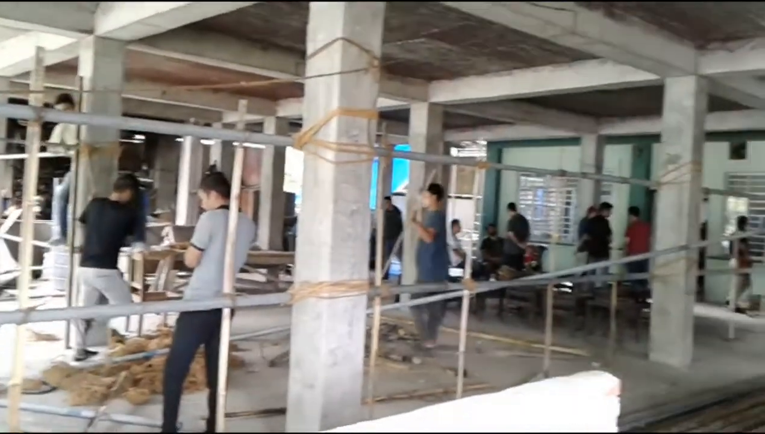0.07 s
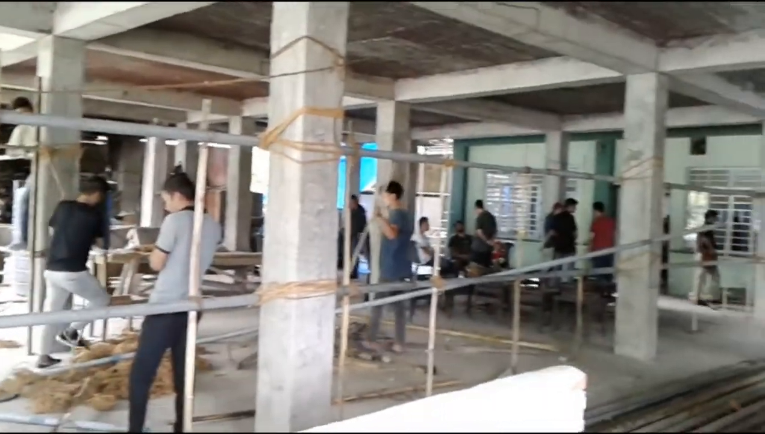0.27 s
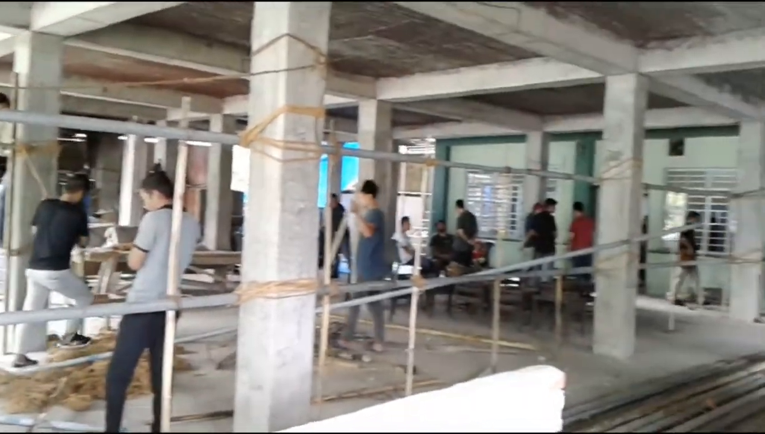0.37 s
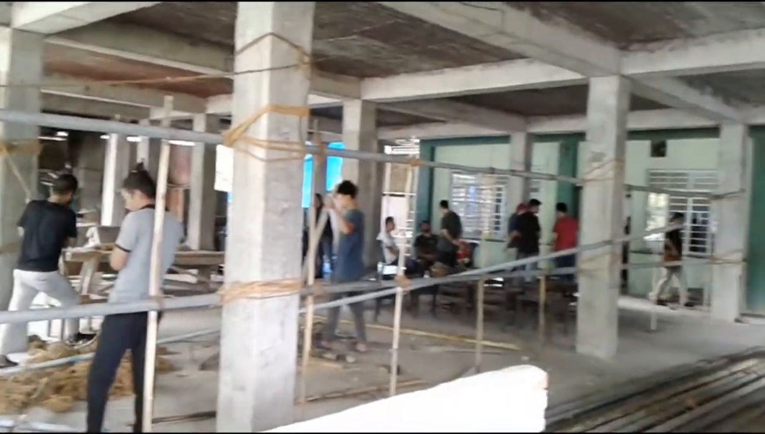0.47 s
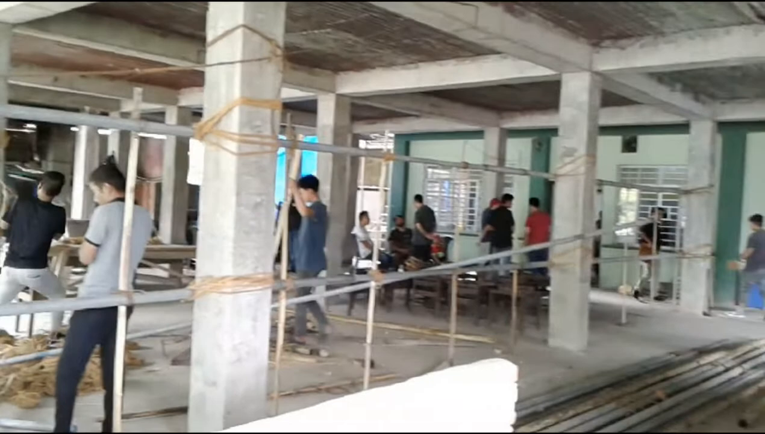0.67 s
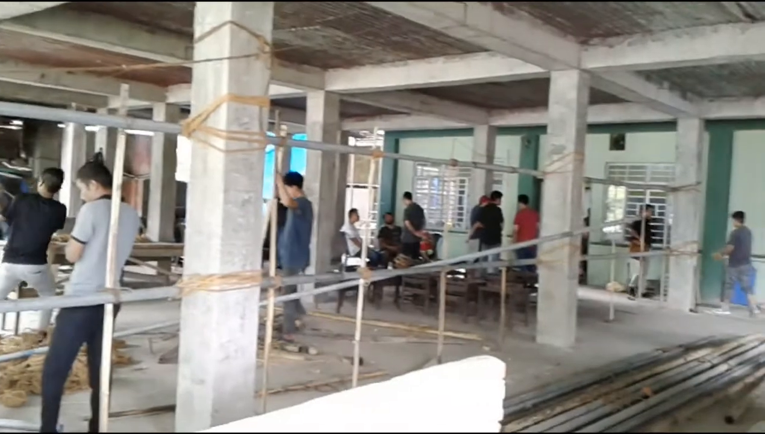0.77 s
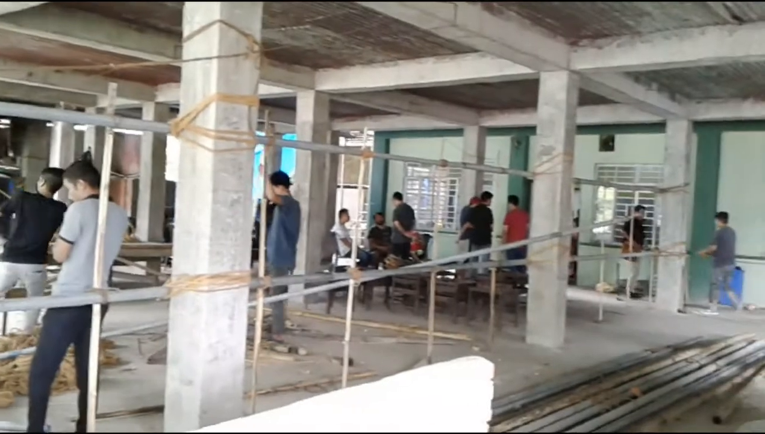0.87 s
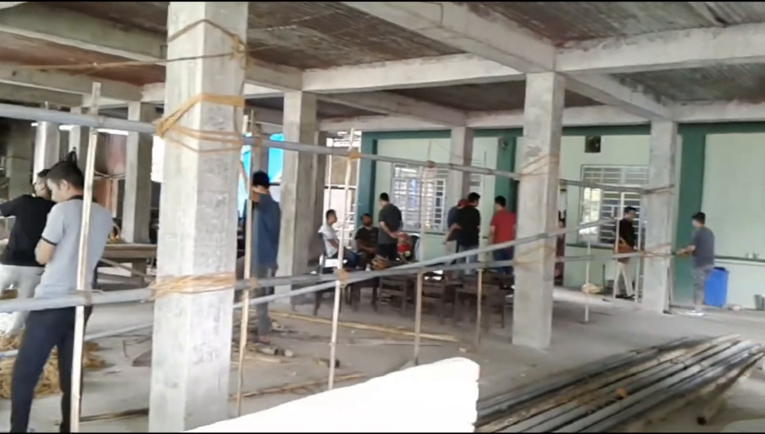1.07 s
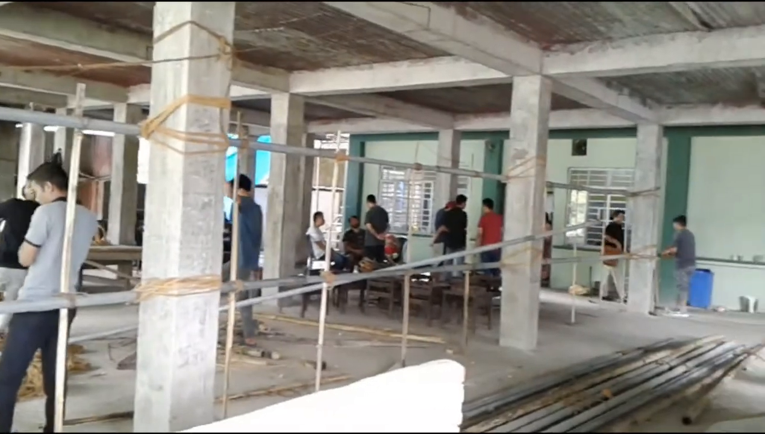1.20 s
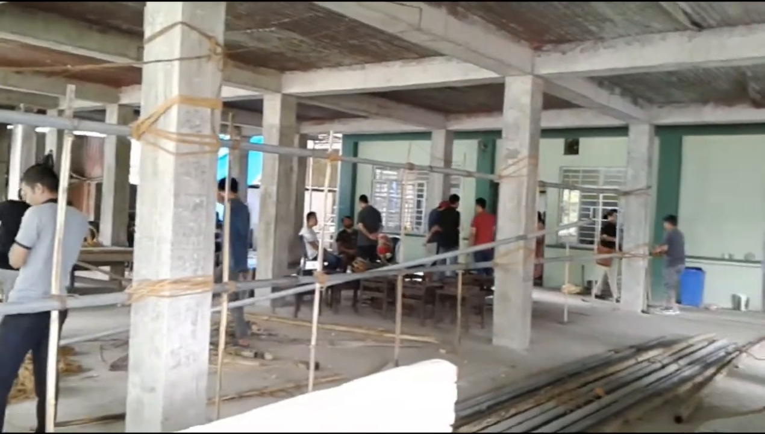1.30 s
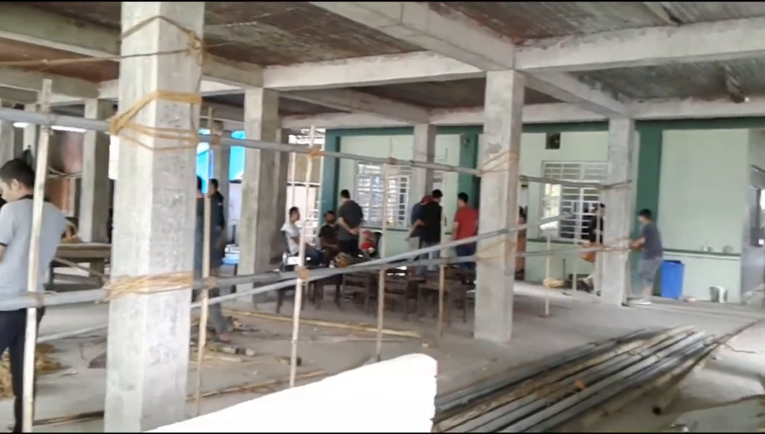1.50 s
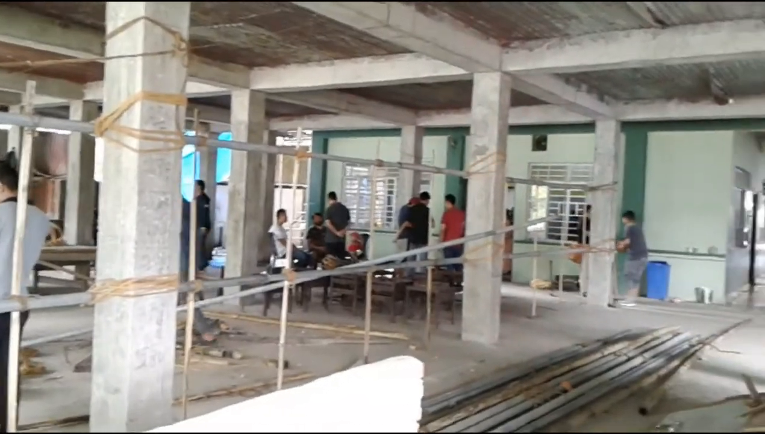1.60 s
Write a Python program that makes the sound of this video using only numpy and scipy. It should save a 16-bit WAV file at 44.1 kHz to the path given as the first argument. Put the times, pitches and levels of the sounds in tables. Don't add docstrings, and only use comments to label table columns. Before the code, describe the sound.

Two loud clanking drops of metal pipes at a building site, the first trailing into a groaning slide, the second a short double bang, then a faint distant tap, low wind bumps and a bare concrete echo.

```python
import sys
import numpy as np
from scipy import signal
from scipy.fft import rfft, irfft
from scipy.io import wavfile
from scipy.ndimage import uniform_filter1d

SR = 44100
rng = np.random.default_rng(int(sys.argv[2]) if len(sys.argv) > 2 else 0)


def pcm_store(signal):
    levels = np.round(np.clip(np.atleast_2d(signal), -1, 1) * 32767)
    wavfile.write(sys.argv[1], SR, levels.astype(np.int16).T)


def decibels_to_gain(level_db):
    exponent = np.asarray(level_db, float) / 20
    return 10 ** exponent


N = 72765

# (frequency [Hz], level [dB])
STEEL = [(410, -26.5), (700, -4), (813, -13.5), (1050, -5), (1890, -5), (2840, -18.5), (3830, -26.5),
         (8090, -56.5), (9000, -61.5), (11700, -71), (15000, -81), (19800, -78.5)]
# (time [s], level [dB], brightness [dB], weight [dB])
RATTLE = [
    (0.226, -62, -3.5, 22),
    (0.231, -35, -9.5, 12),
    (0.25, -36, -8, 10.5),
    (0.282, -33, -8.5, 13.5),
    (0.29, -29.5, -7.5, 9),
    (0.379, -24.5, -8, -1),
    (0.557, -35.5, -11.5, -6),
    (0.717, -56.5, -18, -1),
    (0.78, -64.5, 5, 5),
]


def evened(x):
    return x / np.sqrt(np.mean(x ** 2) + 1e-20)


def read(points, hz):
    f, value = np.transpose(points)
    return np.interp(np.log(hz + 1), np.log(f + 1), value)


def curve(rows, column=1, outside=-120):
    rows = np.array(rows)
    return np.interp(np.arange(N) / SR, rows[:, 0], rows[:, column], outside, outside)


def add(mix, s, sound):
    part = mix[round(s * SR):][:len(sound)]
    part += sound[:len(part)]


def colour(x, points, lo_hz=0, hi_hz=30000):
    hz = np.fft.rfftfreq(len(x), 1 / SR) + 1
    edges = 1 / np.sqrt((1 + (lo_hz / hz) ** 8) * (1 + (hz / hi_hz) ** 8))
    return evened(irfft(rfft(x) * decibels_to_gain(read(points, hz)) * edges, len(x)))


def resonate(x, hz, width):
    turn = np.exp(2j * np.pi * np.cumsum(hz * np.ones(len(x))) / SR)
    r = np.exp(-np.pi * abs(width) / SR)
    return 2 * (turn * signal.lfilter([1 - r], [1, -r], x / turn)).real


def noise_band(noise, hz, width):
    return evened(resonate(resonate(noise, hz, width), hz, width))


def site_floor():
    # (frequency [Hz], level [dB])
    hush = [(410, -38.5), (700, 1), (851, -13.5), (2510, -18), (4500, -27), (5920, -28.5), (7770, -31),
            (11300, -28.5), (15700, -31)]
    # (frequency [Hz], tone level [dB], skirt level [dB])
    whines = [(5749, -84.5, -97), (11499, -91, -92), (11612, -92, -100), (14500, -104, -104),
              (5281, -92, -105)]
    t = np.arange(N) / SR
    out = decibels_to_gain(-74) * colour(rng.standard_normal(N), hush, lo_hz=745)
    for hz, db, skirt_db in whines:
        out += decibels_to_gain(db) * np.sin(2 * np.pi * hz * t)
        out += decibels_to_gain(skirt_db) * noise_band(rng.standard_normal(N), hz, width=300)
    return out


def wind():
    # (time [s], gust level [dB], roar over gust [dB])
    gusts = [(0.0, -51, -10.5), (0.178, -55, -17), (0.26, -52, 27.5), (0.38, -47, 20.5),
             (0.564, -47.5, 17.5), (0.766, -52, 10.5), (0.79, -43, 13.5), (0.868, -46, 16.5),
             (0.942, -47.5, -0.5), (1.006, -40.5, -3.5), (1.024, -43, -12.5), (1.262, -51.5, -1.5),
             (1.406, -42.5, -11.5), (1.432, -54, -10.5), (1.584, -51, -5), (1.65, -55, -16)]
    # (frequency [Hz], level [dB])
    wind_colour = [(12, -20), (20, -9), (80, -4), (113, -11.5), (301, -16), (341, -22), (464, -16),
                   (526, -18.5), (1500, -36.5), (1950, -68), (3300, -120)]
    lump_db, split_hz = 3, 200
    lumps = evened(uniform_filter1d(uniform_filter1d(rng.standard_normal(N), 700), 700))
    noise = rng.standard_normal(N)
    low = colour(noise, wind_colour, hi_hz=split_hz)
    roar = colour(noise, wind_colour, lo_hz=split_hz)
    gust_gain = decibels_to_gain(curve(gusts, outside=-60) + lump_db * lumps - 4.0)
    roar_gain = decibels_to_gain(curve(gusts, column=2, outside=0) - 2.0)
    return gust_gain * (low + roar_gain * roar)


def fizz(x):
    size = np.sqrt(abs(uniform_filter1d(x ** 2, size=130)))
    grit = colour(rng.standard_normal(N), [(9000, -2), (11500, -1), (16000, -12.5)], lo_hz=8500)
    return decibels_to_gain(-59) * size * grit


def hall(x):
    # (frequency [Hz], time to fall 60 dB [s])
    decay = [(200, 0.54), (1000, 1.4), (2000, 1), (4000, 1.23), (6000, 2.6), (10000, 0.87)]
    tilt_db = 7.5
    taps = np.zeros(SR)
    at = np.arange(400, SR - 20, 20)
    taps[at + rng.integers(0, 20, len(at))] = rng.choice([-1., 1.], len(at))
    hz, t, z = signal.stft(taps, SR, nperseg=256)
    tilt = tilt_db * np.log2(np.clip(hz, 300, 5000) / 2000)
    fall = -60 * t / read(decay, hz)[:, None]
    tail = signal.istft(z * decibels_to_gain(tilt[:, None] + fall), SR, nperseg=256)[1]
    return signal.fftconvolve(x, tail / np.linalg.norm(tail))[:N]


def far_tap():
    # (frequency [Hz], width [Hz], level [dB])
    resonances = [(1754, 450, 6), (2310, 390, 3.5), (3620, 550, -12.5), (6840, 900, -21)]
    start_s, level_db, tail_t60_s, tap_t60_s = 1.259, -59.5, 1, 0.16
    t = np.arange(SR // 2) / SR
    noise = rng.standard_normal(len(t))
    body = sum(decibels_to_gain(db) * noise_band(noise, hz, width) for hz, width, db in resonances)
    tail = decibels_to_gain(level_db - 60 * t / tail_t60_s)
    tap = decibels_to_gain(level_db - 6.0 - 60 * t / tap_t60_s)
    return start_s, evened(body) * (tail + tap) * np.minimum(t / 0.0016, 1)


def singing():
    # (frequency [Hz], level [dB])
    kept_modes = [(1023, -36.5), (1082, -34.5), (1507, -34), (1739, -40.5), (1836, -43), (1922, -38.5),
                  (2229, -38), (2272, -36.5), (2670, -43), (3020, -61), (3548, -77), (3693, -48)]
    modes = sum(decibels_to_gain(db) * evened(resonate(rng.standard_normal(N), hz, width=10)) for hz, db in kept_modes)
    return decibels_to_gain(curve(RATTLE) - 4) * evened(modes)


def groan(start, length, hz, db):
    roughness = 0.25
    t = np.arange(0, length, 1 / SR)
    turn = 2 * np.pi * hz * t
    rough = noise_band(rng.standard_normal(SR // 4)[:len(t)], hz, width=60)
    clean = np.sin(turn) + decibels_to_gain(-18) * np.sin(turn / 2) + decibels_to_gain(-18) * np.sin(2 * turn)
    tone = np.sqrt(2) * (1 - roughness) * clean + roughness * rough
    swell = abs(np.sin(np.pi * (t / length) ** .9)) ** .6
    return start, decibels_to_gain(db) * swell * tone


def pipe_tick():
    t60_s = 0.08
    t = np.arange(4096) / SR
    hz = (np.geomspace(300, 12000, num=90) * rng.uniform(.97, 1.03, 90))[:, None]
    phase = 2 * np.pi * rng.random((90, 1))
    decay = decibels_to_gain(-60 * t * (hz / 2000) ** .5 / t60_s)
    return (np.sqrt(hz) * np.sin(2 * np.pi * hz * t + phase) * decay).sum(0)


def rattle():
    # (time [s], level [dB], brightness [dB], weight [dB])
    second_rattle = [
        (0.775, -61.5, 9, -9),
        (0.785, -27, -21, -1),
        (0.827, -31.5, -8.5, 4),
        (0.841, -21, -21.5, 2.5),
        (0.939, -50.5, -9, 15.5),
        (1.05, -68, -25, 23),
        (1.2, -96, -8.5, 26.5),
    ]
    # (frequency [Hz], level [dB])
    stack = [(29, -51), (50, -19.5), (178, 2), (372, -7), (413, -13.5), (600, -7.5), (780, -28.5),
             (1320, -120)]
    ticks_per_s, tick_spread_db, scrape_db, split_hz = 900, 2.2, 0.5, 3670
    size = decibels_to_gain(tick_spread_db * np.minimum(rng.exponential(1, N), 4))
    size = size * (rng.random(N) < ticks_per_s / SR)
    which, ticks = rng.integers(0, 12, N), np.zeros(N)
    for k in range(12):
        ticks += signal.oaconvolve(size * (which == k), pipe_tick())[:N]
    ticks /= np.sqrt(uniform_filter1d(ticks ** 2, 2000) + 1e-9)
    ticks = ticks + decibels_to_gain(scrape_db) * rng.standard_normal(N)
    low = colour(ticks, STEEL, hi_hz=split_hz)
    high = colour(ticks, STEEL, lo_hz=split_hz)
    shake = colour(rng.standard_normal(N), stack)
    out = np.zeros(N)
    for rows, trim_db in ((RATTLE, -1.5), (second_rattle, -5.0)):
        brightness = decibels_to_gain(curve(rows, column=2, outside=0))
        weight = decibels_to_gain(curve(rows, column=3, outside=0) - 4.5)
        out += decibels_to_gain(curve(rows) + trim_db) * (low + brightness * high + weight * shake)
    return out


def thud(start, db, hz, t60):
    t = np.arange(SR // 3) / SR
    turn = 2 * np.pi * hz * t
    push = np.sin(turn) + 0.18 * np.sin(2 * turn + 0.72)
    return start, decibels_to_gain(db - 60 * t / t60) * (1 - np.exp(-t / 0.0012)) * push


def knock(start, db, hz, t60):
    # (frequency [Hz], level [dB], time to fall 60 dB [s])
    pipe = [(1220, -20, 0.42), (1350, -44, 5.0), (1580, -31.5, 0.46), (1660, -31, 0.16),
            (1880, -26.5, 0.41), (2000, 3.5, 0.0482), (2020, -33.5, 5.0), (2500, -23.5, 0.14),
            (3940, -22.5, 0.033)]
    wide_db, crack_db, crack_s, ring_db, ring_max_s = -0.5, 0, 0.0015, -4.5, 0.053
    t = np.arange(SR // 2) / SR
    noise, spread = rng.standard_normal(len(t)), rng.standard_normal((len(pipe), 2))
    body = noise_band(noise, hz, width=550) + decibels_to_gain(wide_db) * colour(noise, STEEL)
    crack = np.exp(-t / crack_s) * (np.sin(2 * np.pi * hz * t) + 0.04 * body)
    out = 0.22 * body * decibels_to_gain(-60 * t / t60) + decibels_to_gain(crack_db) * crack
    for (f, level_db, ring), (a, b) in zip(pipe, spread):
        near_db = -6 * np.log2(f / hz) ** 2 / 0.79
        mode_db = ring_db + 0.55 * level_db + near_db + 8.8 * a
        fall_db = -60 * t / min(ring, ring_max_s, 0.36 * t60)
        out += 0.22 * decibels_to_gain(mode_db + fall_db) * np.sin(2 * np.pi * f * (1 + 0.044 * b) * t)
    return start, decibels_to_gain(db) * np.minimum(t / .0005, 1) * out


def scene():
    # (time [s], peak level [dB], centre [Hz], time to fall 60 dB [s])
    knocks = [(.2255, -42, 1490, .03), (0.2315, -17, 2050, 0.07), (0.2865, -20, 1500, .04),
              (.2935, -14, 1800, .05), (.303, -22.5, 1074, 0.029), (.3365, -24, 1560, 0.04),
              (.3505, -18.5, 1510, 0.023), (.3715, -15, 1750, 0.051), (.392, -17.5, 1800, 0.024),
              (.409, -21.5, 1520, 0.025), (0.781, -22, 1476, 0.037), (.7862, -15, 2300, 0.07),
              (.788, -28, 3900, .09), (.8388, -12.5, 1950, 0.14), (.8335, -24, 1780, 0.027),
              (0.851, -20.5, 2000, 0.2), (.99, -51, 650, 0.037), (1.0103, -56, 1480, 0.035),
              (1.259, -40, 2300, 0.047), (1.2586, -63.5, 6870, .05)]
    # (time [s], peak level [dB], pitch [Hz], time to fall 60 dB [s])
    thuds = [(.203, -30.5, 152, 0.015), (0.224, -28.5, 164.5, 0.062), (0.257, -14, 153.6, 0.095),
             (0.2693, -10, 200, 0.053), (0.301, -24, 201, 0.13), (0.356, -18.5, 239, 0.07),
             (0.409, -27.5, 177, 0.1), (.776, -23, 167, 0.045), (0.8099, -13.5, 169, 0.05),
             (0.8227, -16, 175.5, 0.043), (0.829, -21.5, 231, 0.056), (0.861, -26.5, 145, 0.032),
             (0.889, -24.5, 93, 0.12), (0.982, -33, 141, 0.071), (1.041, -27.5, 95, 0.023),
             (1.11, -33, 94, 0.071), (1.236, -41.5, 82.3, 0.16), (1.251, -35, 47.7, 0.11),
             (1.282, -31, 69, 0.059), (1.3271, -31.5, 172, 0.03), (1.335, -33, 74, 0.11),
             (1.36, -37, 174, 0.051), (1.374, -37, 153, 0.024), (1.38, -45, 410, 0.012),
             (1.387, -28, 200, 0.022), (1.393, -36, 181, 0.043), (1.403, -32, 200, 0.028),
             (1.41, -34.5, 54.4, 0.046), (1.606, -31.5, 68, 0.04)]
    # (start [s], length [s], pitch [Hz], level [dB])
    groans = [(.402, .028, 663, -24), (.42, .032, 668, -23), (.45, .05, 682, -27), (.499, .034, 716, -26),
              (.538, .028, 703, -30), (.578, .04, 718, -31), (.616, .055, 707, -35), (.68, .05, 700, -45),
              (.422, .03, 545, -29), (.455, .035, 470, -34), (.485, .025, 508, -35), (.512, .03, 503, -29),
              (.54, .036, 490, -24), (.58, .024, 490, -31), (.602, .034, 489, -30), (.51, .1, 247, -38),
              (.705, .03, 490, -43), (.985, .04, 480, -47), (1.09, .14, 490, -60)]
    hall_db, air_edge_hz, air_leak_db = -20, 8100, -36
    steel, lows = rattle() + singing(), np.zeros(N)
    for row in knocks:
        add(steel, *knock(*row))
    add(steel, *far_tap())
    for row in thuds:
        add(lows, *thud(*row))
    for row in groans:
        add(steel, *groan(*row))
    steel = steel + decibels_to_gain(hall_db) * hall(steel)
    dull = signal.sosfilt(signal.butter(8, air_edge_hz, fs=SR, output="sos"), steel)
    dull = dull + decibels_to_gain(air_leak_db) * steel
    return (dull + fizz(dull) + lows + wind() + site_floor())[None]


def roll_off(x):
    return signal.sosfilt(signal.butter(12, 15750, fs=SR, output="sos"), x)


def record(dry):
    return roll_off(dry)


dry = scene()
out = record(dry)
pcm_store(out)
```